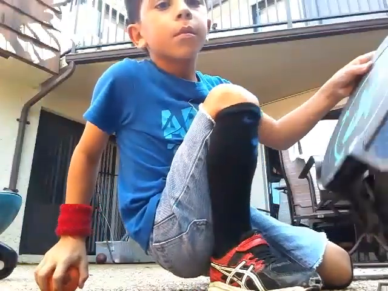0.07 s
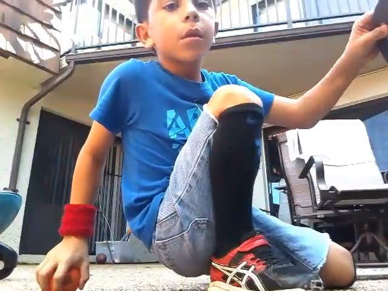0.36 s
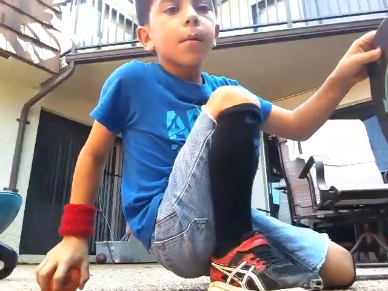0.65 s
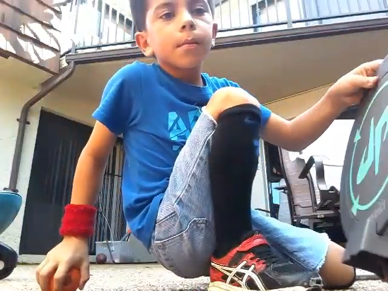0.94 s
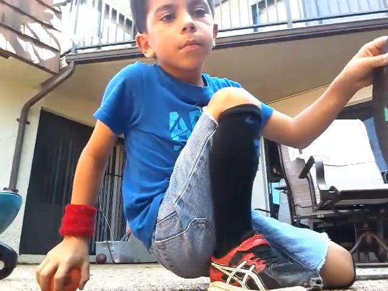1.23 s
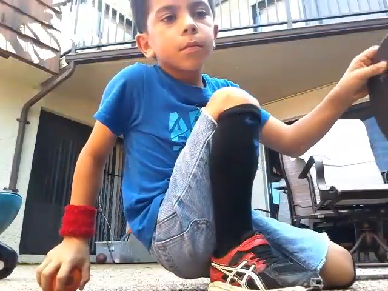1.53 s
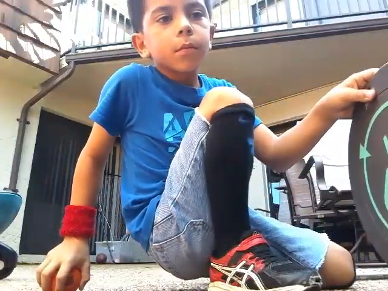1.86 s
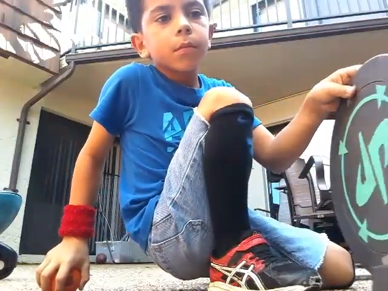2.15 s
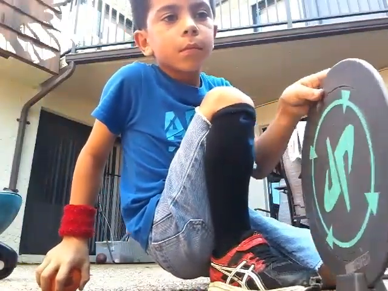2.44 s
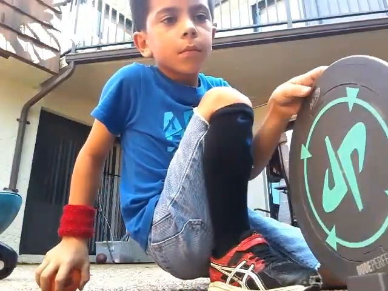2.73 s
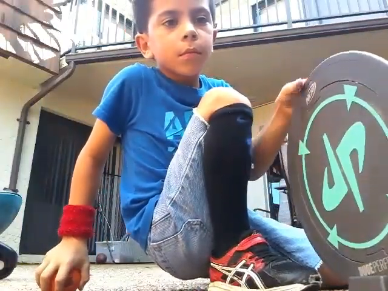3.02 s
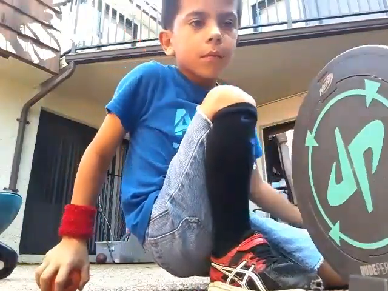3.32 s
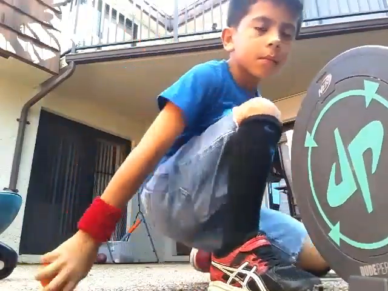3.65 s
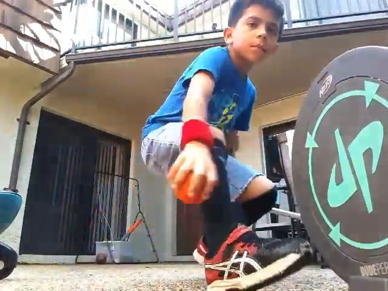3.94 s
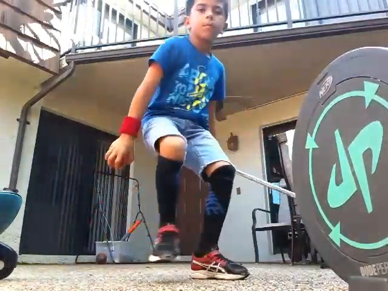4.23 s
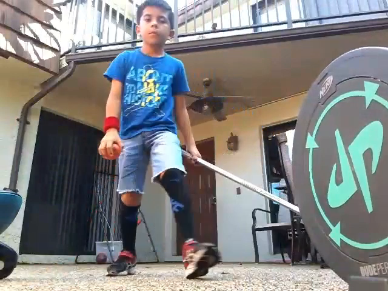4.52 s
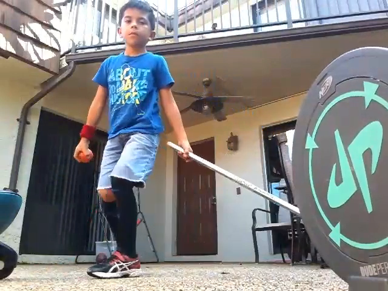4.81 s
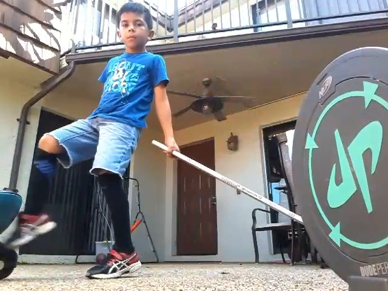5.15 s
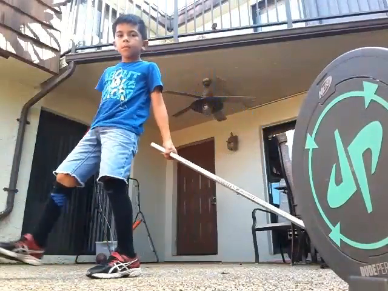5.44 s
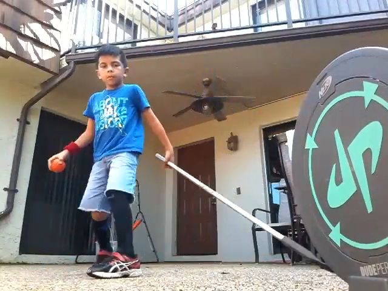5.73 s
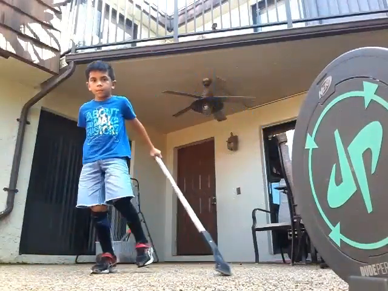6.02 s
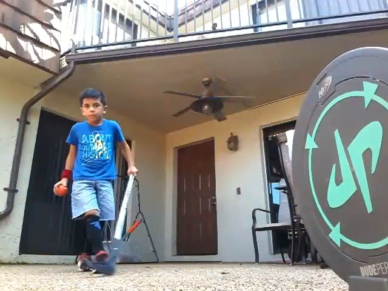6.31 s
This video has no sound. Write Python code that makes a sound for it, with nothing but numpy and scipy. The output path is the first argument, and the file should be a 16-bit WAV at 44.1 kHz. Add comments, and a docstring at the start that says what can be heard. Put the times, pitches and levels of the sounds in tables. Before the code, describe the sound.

A plastic target knocks on concrete, a few steps scuff, then a plastic hockey stick blade lands and scrapes loudly close by.

```python
"""Grit ticks under a plastic target as a child shifts it on a concrete patio; its base knocks and judders.
He gets up with a few scuffing steps. Then the loudest sound, close to the microphone: the plastic
blade of a hockey stick lands and is dragged, sticking and slipping over the rough slab.
The microphone is a phone lying on the patio. The porch roof and walls echo it all, with a faint bird,
over distant town noise, a hum and a thin steady whine."""
import sys
import numpy as np
from scipy import signal
from scipy.fft import rfft, irfft
from scipy.io import wavfile
from scipy.ndimage import uniform_filter1d

SR = 44100
rng = np.random.default_rng(int(sys.argv[2]) if len(sys.argv) > 2 else 0)


def unload_wav(signal):
    """Save mono or channel-first audio to the path in sys.argv[1] as 16-bit WAV at rate SR, clipped to [-1, 1]."""
    wavfile.write(
        sys.argv[1],
        SR,
        np.round(np.clip(np.atleast_2d(signal).T, -1, 1) * 32767).astype(np.int16),
    )


N = 280901
TIME = np.arange(N) / SR


# modes of the plastic blade: f/Hz, relative level/dB, t60/s
BLADE_MODES = [(168, -17, 0.086), (200, -14, 0.078), (286, -19, 0.041), (361, 8.5, 0.077), (420, 11, 0.037),
               (486, 9.5, 0.06), (665, 3.5, 0.074), (800, -20, 0.025), (960, -3, 0.033), (1110, -11, 0.042),
               (1380, -22, .04), (1530, -30.5, .035), (2770, -13.5, .012), (4100, -5, .007),
               (6370, -2, 0.017)]
# spectrum of stone grains against the blade: f/Hz, relative level/dB
GRIND_SPECTRUM = [(45, -37), (90, -12), (220, 6.5), (420, 7.5), (620, 1.5), (1050, 6.5), (1400, -9.5),
                  (2000, -20), (3300, -14.5), (4400, -16), (5500, -18), (6900, -13.5), (8100, -37.5),
                  (13000, -39), (15000, -68.5)]
# pressure on the blade as it lands, then after one bounce as it drags on: t/s, relative level/dB
LANDING_PRESSURE = [(5.257, -16.5), (5.383, -16), (5.407, -29.5), (5.415, -21)]
DRAG_PRESSURE = [(5.421, -14), (5.491, -15.5), (5.935, -18), (5.971, -17), (6.213, -29), (6.297, -21.5),
                 (6.331, -31), (6.37, -32)]
# the blade catches on a stone and lets go: t/s, relative level/dB, hardness/dB
SNAGS = [(5.2577, -21, 7), (5.3129, -17, 19), (5.3755, -18, -8), (5.4199, -25, 19), (5.423, -7, 6),
         (5.4603, -13, 6), (5.4889, -11.5, 1), (5.5667, -13, -3), (5.5933, -11, -3), (5.6294, -12, 7.5),
         (5.692, -11.5, 5), (5.7973, -13, -6), (5.8754, -12, -2), (5.903, -15, 5), (5.9761, -10, 4)]
# the lightened blade skips and clacks: t/s, relative level/dB
SKIPS = [(6.036, -17), (6.0952, -17), (6.1739, -25.5), (6.1983, -22.5), (6.2613, -22), (6.2932, -26.5)]

def hockey_stick(slips_per_s=62, crush_s=0.0068):
    """Close to the microphone the blade chatters: each slip flexes it, rattles it and crushes grit."""
    flex, rattle, grit = body(BLADE_MODES, GRIND_SPECTRUM, ring_db=-3.5, edges_hz=[650, 2000])
    snag_s, snag_db, hardness_db = np.transpose(SNAGS)
    skip_s, skip_db = np.transpose(SKIPS)
    pressure = gain_curve(LANDING_PRESSURE) + gain_curve(DRAG_PRESSURE)
    bite_db = blade_bite()
    bumps = undb(3 * np.clip(walk(rate=170), -2, 2))  # the same bumps drive all three bands
    jerks = slips(slips_per_s, jitter=0.3, spread_db=2.5)
    jerk_energy = signal.lfilter([1], [1, -np.exp(-1 / (crush_s * SR))], jerks ** 2)
    crush = 1 + undb(-0.5) * unit(jerk_energy)

    def excite(band, friction, jerk_db, drag_db, catch_db, clack_db, brightening, crunch):
        """One band under drag, snags and skips; brightening is its dB gain per dB of hardness."""
        scrape = steady(convolve(friction * bumps + undb(jerk_db) * jerks, band), seconds=0.0244)
        scrape *= pressure * undb(drag_db + brightening * bite_db)
        levels_db = np.r_[snag_db + catch_db + brightening * hardness_db, skip_db + clack_db]
        impacts = blows(np.r_[snag_s, skip_s], levels_db, crunch, crunch_s=0.008)
        return scrape + convolve(impacts, band)

    blade = excite(flex, grains(rate=500, spread_db=0.5), jerk_db=1.5, drag_db=-1.5,
                   catch_db=-1.2, clack_db=-7, brightening=-0.06, crunch=0.48)
    blade = wander(blade, 284, 570, depth_db=1.5, rate=25, count=4)
    blade += excite(rattle, grains(rate=1100, spread_db=2.5), jerk_db=-3, drag_db=-14,
                    catch_db=-15.5, clack_db=0.5, brightening=1, crunch=0.88)
    blade += excite(grit, grains(rate=3500, spread_db=4.5) * crush, jerk_db=-11, drag_db=-26.5,
                    catch_db=-20, clack_db=-29, brightening=0.73, crunch=2.2)
    return wander(blade, 910, 4950, depth_db=3, rate=35) + shaft_thump()


def blade_bite(fade_s=0.082, tip_at_s=5.58, tip_s=0.047):
    """Contact hardness in dB: up briefly at each landing, and for good as the blade tips on edge."""
    landings = LANDING_PRESSURE[0][0], DRAG_PRESSURE[0][0]
    digging_in = sum((TIME >= s) * np.exp(-np.abs(TIME - s) / fade_s) for s in landings)
    on_edge = np.clip((TIME - tip_at_s) / tip_s, 0, 1)
    return 10 * digging_in + 7 * on_edge


# bending modes of the shaft: f/Hz, level/dB, t60/s
SHAFT_MODES = [(151.6, -12, 0.15), (221.7, -15.5, 0.18)]

def shaft_thump():
    """The long shaft flexes and thumps once, when the blade first lands."""
    t = np.maximum(TIME - SNAGS[0][0], 0)
    rise = 1 - np.exp(-t / 0.0054)  # the weight comes on over a few milliseconds
    return rise * ringing(SHAFT_MODES, t)


# the target's base meets the slab: t/s, low level/dB, hollow level/dB, treble level/dB
KNOCKS = [(1.7715, -30.5, -31, -22.5), (1.7754, -22.5, -21.5, -20.5), (1.781, -20, -26, -31.5),
          (1.801, -37, -25, -39), (1.872, -44, -33, -31), (1.8826, -42, -33.5, -26), (1.922, -40, -27, -49),
          (1.9998, -40.5, -46.5, -43.5), (2.13, -38.5, -40.5, -53), (2.175, -35.5, -39, -51),
          (2.191, -43, -33, -54), (2.2101, -36, -29, -37), (2.2518, -40, -36, -41), (2.2724, -46, -38, -48),
          (2.4718, -48, -41.5, -42.5), (2.4939, -46, -39, -47), (2.526, -56, -40.5, -75),
          (2.5811, -44, -40, -56.5), (3.0148, -47.5, -42.5, -54), (3.327, -62, -55.5, -65)]
# modes of the base: f/Hz, relative level/dB, t60/s
BASE_MODES = [(374, -4, .05), (566, -5, 0.069), (1060, -17.5, 0.07), (1322, -1, 0.026), (1424, -10, 0.035),
              (1560, -11.5, 0.06), (2410, -9, 0.021), (3020, -4, 0.0071), (5440, -1, 0.013),
              (6460, 0, 0.018), (6690, 5, 0.018), (6940, -2, 0.014)]
# spectrum of hard plastic cracking against stone: f/Hz, relative level/dB
CRACK_SPECTRUM = [(60, -24), (200, -7), (500, 5), (870, -17.5), (1500, 1.5), (2050, -10), (3000, -2.5),
                  (4400, -12), (5600, 0), (6800, 2.5), (8300, -14.5), (15500, -41)]
# the base is pushed along: t/s, hold/s, relative level/dB
SLIDES = [(1.775, 0.018, -44), (2.16, .13, -45), (2.44, 0.043, -51), (2.56, 0.11, -58.5)]

def target(judders_per_s=63):
    """The hollow base knocks on the patio and judders as it slides, with grit under it."""
    times, low_db, hollow_db, treble_db = np.transpose(KNOCKS)
    clack_db = (hollow_db + treble_db) / 2 - 0.5
    low, hollow, clack, treble = body(BASE_MODES, CRACK_SPECTRUM, ring_db=-1.5,
                                      edges_hz=[800, 2100, 4500])
    # the push moves the whole base; the crunch after it is heard in the upper bands
    knocks = convolve(blows(times, low_db, crunch=0.45, crunch_s=0.004), low)
    knocks += convolve(blows(times, hollow_db, crunch=1, crunch_s=0.013), hollow)
    knocks += convolve(blows(times, clack_db, crunch=0.98, crunch_s=0.0068), clack)
    knocks += convolve(blows(times, treble_db, crunch=1.2, crunch_s=0.0019), treble)
    friction = undb(-2.5) * grains(rate=900, spread_db=2.5)
    judder = undb(-3) * slips(judders_per_s, jitter=0.2, spread_db=2.5)
    slide_force = (friction + judder) * strokes(SLIDES, attack_s=0.012, release_s=0.098)
    slide = convolve(slide_force, undb(1) * (low + hollow) + undb(-5) * clack + undb(-13.5) * treble)
    ticks = grit_ticks()
    return wander(knocks + slide, 1200, 6300, depth_db=1.5, rate=40) + ticks


# single grains snap under the base: t/s, relative level/dB, ring f/Hz
SNAPS = [(0.242, -49.5, 6300), (0.8024, -34, 5340), (0.8103, -44, 5250), (1.289, -46.5, 4940),
         (1.4988, -47.5, 6540), (1.5557, -46, 7050), (1.6367, -48, 6000), (1.7102, -45.5, 6700),
         (1.821, -38, 6200)]
# loose grit crackles as the base rocks on it: t/s, hold/s, relative level/dB
CRACKLES = [(.8, 0.049, -52.5), (.96, .025, -61), (1.31, 0.31, -63), (1.65, 0.065, -57.5)]
# spectrum of the grit: f/Hz, relative level/dB
GRIT_SPECTRUM = [(300, -7), (1500, -18), (2800, -1.5), (4000, -7), (5300, -0.5), (6700, 5.5), (8500, -9.5),
                 (11000, -15), (15500, -23)]

def grit_ticks():
    """Single grains crack and ring briefly, each at its own pitch, among a finer crackle."""
    snaps = np.zeros(N)
    for s, db, hz in SNAPS:
        crack = blows([s], [db], crunch=0.96, crunch_s=0.0068)
        ring = signal.lfilter(*signal.iirpeak(hz, 12, fs=SR), crack)
        snaps += undb(-2.5) * crack + undb(1.5) * ring
    crackle = grains(rate=220, spread_db=5.5) * strokes(CRACKLES, attack_s=0.008, release_s=0.033)
    ticks = convolve(snaps + crackle, colour(GRIT_SPECTRUM))
    return wander(ticks, 2900, 7000, depth_db=2.5, rate=42, count=6)


# footfalls on the patio: t/s, relative level/dB, length/s
STEPS = [(3.667, -42, 0.031), (3.929, -42.5, 0.035), (4.185, -37.5, 0.065), (4.1957, -26.5, 0.013),
         (4.233, -39.5, 0.034), (4.482, -42.5, 0.028), (4.791, -47, 0.057), (6.021, -23.5, 0.14)]
# spectrum of a shoe on concrete: f/Hz, relative level/dB
STEP_SPECTRUM = [(50, -20), (150, 4), (220, -5.5), (370, 1), (550, -7), (700, -2.5), (870, -16), (1100, -7),
                 (1500, -17.5), (2500, -13.5), (4200, -28.5), (6400, -28), (8500, -51), (15000, -55)]
# scuffs of a sole and swishes of clothing: t/s, hold/s, relative level/dB
SCUFFS = [(3.655, .03, -49), (3.78, 0.24, -56), (4.02, 0.088, -51), (4.16, 0.065, -49), (4.32, 0.09, -45.5),
          (4.45, 0.17, -58), (4.755, 0.047, -50)]
SWISHES = [(3.78, .22, -62), (3.89, 0.047, -61), (4.145, 0.035, -59), (4.375, .04, -61)]

def footsteps():
    """Shoes thud on the slab, soles scuff and squeak, and clothes swish."""
    times, levels_db, lengths_s = np.transpose(STEPS)
    footfalls = blows(times, levels_db + 4.5, crunch=4.6, crunch_s=lengths_s)
    thuds = convolve(footfalls, colour(STEP_SPECTRUM))
    scuff = grains(rate=1100, spread_db=3) * strokes(SCUFFS, attack_s=0.011, release_s=0.12)
    swish = grains(rate=5100, spread_db=6) * strokes(SWISHES, attack_s=0.014, release_s=0.09)
    dull = colour([(150, 9), (380, 8.5), (800, 4), (2800, -5), (4500, -18.5), (9000, -33)])
    airy = colour([(2000, -8), (5000, -7.5), (6600, 3), (8500, -25.5), (14000, -32)])
    return thuds + undb(-0.5) * convolve(scuff, dull) + undb(-1) * convolve(swish, airy) + sole_squeak()


def sole_squeak(at_s=3.895, length_s=0.076, start_hz=6700, sag_hz=270, level_db=-54.5):
    """Rubber twists on the slab: a thin, rough whistle."""
    roughness = 1 + 0.025 * walk(rate=900)
    return whistle(at_s, length_s, start_hz, start_hz - sag_hz, level_db, roughness)


def porch_echo(x, t60_low_s, t60_high_s, delay_s):
    """Scattered echoes reach the microphone from walls and roof; the treble dies first."""
    t = TIME[:SR]
    noise = rng.standard_normal(SR)
    low = signal.sosfilt(signal.butter(2, 2000, fs=SR, output="sos"), noise)
    tail = low * undb(-60 * t / t60_low_s) + (noise - low) * undb(-60 * t / t60_high_s)
    tail *= np.clip(t / delay_s - 0.5, 0, 1)
    return convolve(x, tail / np.linalg.norm(tail))


# calls of a distant bird: t/s, length/s, start f/Hz, end f/Hz, relative level/dB
CHIRPS = [(0.081, 0.14, 3210, 2650, -70), (.25, 0.12, 3600, 3100, -71), (0.478, .12, 3330, 2850, -69),
          (0.612, 0.13, 3030, 2700, -70), (3.214, .12, 3230, 2890, -65.5), (4.77, 0.1, 3750, 3430, -63.5)]

def bird():
    """Faint falling whistles with a slight warble, far from the patio."""
    warble = 1 + 0.038 * walk(rate=140)
    return sum(whistle(*chirp, warble) for chirp in CHIRPS)


# spectrum of the distant town: f/Hz, relative level/dB
TOWN_SPECTRUM = [(24, -30), (40, -7), (120, -2), (149, -4.5), (234, -5), (264, -8.5), (359, -10),
                 (527, -17), (653, -15), (1340, -29), (4850, -41), (6610, -46.5), (12000, -46),
                 (15600, -77), (22000, -120)]
# a machine's hum and a thin electronic whine: f/Hz, level/dB
HUM_AND_WHINE = [(118.4, -55), (240, -61), (14217, -55)]

def background(town_db=-48.5, hiss_db=-69, drift_hz=1.616):
    """Distant town noise that wavers a little, the microphone's own hiss, hum and whine."""
    town = unit(convolve(rng.standard_normal(N), colour(TOWN_SPECTRUM)))
    town *= undb(town_db + 0.52 * walk(rate=3.7))
    hiss_colour = colour([(4000, -13.5), (5800, -5), (6600, -0.5), (7300, -7.5), (9000, -40)])
    hiss = undb(hiss_db) * convolve(rng.standard_normal(N), hiss_colour)
    drift_cycles = drift_hz * np.cumsum(walk(rate=6)) / SR
    tones = sum(undb(db) * np.sqrt(2) * np.sin(2 * np.pi * (hz * TIME + drift_cycles))
                for hz, db in HUM_AND_WHINE)
    return town + hiss + tones


def body(modes, crack_spectrum, ring_db, edges_hz):
    """Contact crack plus ringing modes, split at the edges into band responses of unit energy."""
    crack = colour(crack_spectrum)
    ring = ringing(modes, TIME[:len(crack)])
    ring = signal.sosfilt(signal.butter(4, 7500, fs=SR, output="sos"), ring)
    response = crack + undb(ring_db) * ring / np.linalg.norm(ring)
    middle_bands = [(pair, "band") for pair in zip(edges_hz, edges_hz[1:])]
    bands = [(edges_hz[0], "low"), *middle_bands, (edges_hz[-1], "high")]
    parts = [signal.sosfilt(signal.butter(3, hz, kind, fs=SR, output="sos"), response)
             for hz, kind in bands]
    return [part / np.linalg.norm(part) for part in parts]


def ringing(modes, t):
    """Struck modes, each falling 60 dB in its t60."""
    return sum(undb(db - 60 * t / t60) * np.cos(2 * np.pi * hz * t) for hz, db, t60 in modes)


def blows(times, levels_db, crunch, crunch_s):
    """Force of each blow: a sharp push, then a short crunch; level is rms as if spread over 5 ms."""
    force, t = np.zeros(N + SR), TIME[:SR // 4]
    for s, db, length in zip(times, levels_db, np.broadcast_to(crunch_s, len(times))):
        push = rng.standard_normal(len(t)) * undb(-20 * t / length)
        push *= crunch / np.linalg.norm(push)
        push[0] += 1
        start = int(s * SR)
        force[start:start + len(t)] += undb(db) * np.sqrt(0.005 * SR) * push / np.linalg.norm(push)
    return force[:N]


def slips(rate, jitter, spread_db, count=1200):
    """Stick-slip: jerks of uneven size at uneven gaps, about rate a second."""
    gap, size = np.clip(rng.standard_normal((count, 2)), -2, 2).T
    at = (np.cumsum(np.exp(jitter * gap)) * SR / rate).astype(int)
    return unit(np.bincount(at[at < N], undb(spread_db * size)[at < N], N))


def grains(rate, spread_db):
    """Random small impacts of uneven size, rate a second."""
    size = undb(spread_db * np.clip(rng.standard_normal(N), -2, 2))
    return unit((rng.random(N) < rate / SR) * size * rng.choice([-1, 1], N))


def wander(x, low_hz, high_hz, depth_db, rate, count=9):
    """The contact point moves, so now one resonance stands out, now another."""
    for hz in np.geomspace(low_hz, high_hz, count):
        band = signal.lfilter(*signal.iirpeak(hz, 7, fs=SR), x)
        gain = undb(depth_db * np.clip(walk(rate), -2, 2))
        x = x + (gain - 1) * band
    return x


def whistle(at_s, length_s, start_hz, end_hz, db, waver):
    """A gliding tone that swells and fades; waver multiplies its pitch."""
    progress = np.clip((TIME - at_s) / length_s, 0, 1)
    hz = (start_hz + (end_hz - start_hz) * progress) * waver
    return undb(db) * np.sin(np.pi * progress) * np.sin(2 * np.pi * np.cumsum(hz) / SR)


def strokes(rows, attack_s, release_s):
    """Gain of rubbing strokes: each comes on, holds, then falls 20 dB per release time."""
    return sum(undb(db - 20 * np.maximum(TIME - s - hold, 0) / release_s)
               * np.clip((TIME - s) / attack_s, 0, 1) for s, hold, db in rows)


def gain_curve(rows):
    """Gain through (t/s, level/dB) points, silent outside them."""
    s, db = np.transpose(rows)
    return uniform_filter1d(undb(np.interp(TIME, s, db, left=-150, right=-150)), size=128)


def colour(points, size=4096):
    """Causal response of unit energy with the given (f/Hz, level/dB) spectrum."""
    hz, db = np.transpose(points)
    bin_hz = np.maximum(np.arange(size // 2 + 1) * SR / size, 1)
    magnitude = undb(np.interp(np.log(bin_hz), np.log(hz), db))
    cepstrum = irfft(np.log(magnitude))
    cepstrum[1:size // 2] *= 2  # fold onto positive time for minimum phase
    cepstrum[size // 2 + 1:] = 0
    response = irfft(np.exp(rfft(cepstrum)))
    return response / np.linalg.norm(response)


def walk(rate):
    """Random curve of rms 1 that changes about rate times a second."""
    hold = int(SR / rate)
    stairs = np.repeat(rng.standard_normal(N // hold + 1), hold)
    return unit(uniform_filter1d(stairs, hold)[:N])


def steady(x, seconds):
    """Even out the slow swells of a signal and keep its fast ones."""
    power = uniform_filter1d(x ** 2, int(seconds * SR))
    return x / np.sqrt(np.maximum(power, 0) + 1e-6)


def convolve(x, response):
    """Pass a sound through an impulse response."""
    return signal.fftconvolve(x, response)[:N]


def undb(db):
    """Decibels to gain."""
    return 10 ** (np.asarray(db) / 20)


def unit(x):
    """Scale to rms 1."""
    return x / np.sqrt(np.mean(x ** 2))


def scene():
    """The patio in mono from where the phone lies; the bird arrives only by reflection."""
    base, steps, stick = target(), footsteps(), hockey_stick()
    send = undb(-13) * (base + stick) + undb(-11) * steps + undb(2) * bird()
    echo = porch_echo(send, t60_low_s=0.48, t60_high_s=0.32, delay_s=0.0068)
    return (stick + base + steps + echo + background())[None]


def record(dry, bass_hz=50, top_hz=15100):
    """The phone drops the deep bass, clips at full scale and cuts the top."""
    thin = signal.sosfilt(signal.butter(6, bass_hz, "high", fs=SR, output="sos"), dry)
    return signal.sosfilt(signal.ellip(8, 0.1, 80, top_hz, fs=SR, output="sos"), np.clip(thin, -1, 1))


dry = scene()
out = record(dry)
unload_wav(out)
```